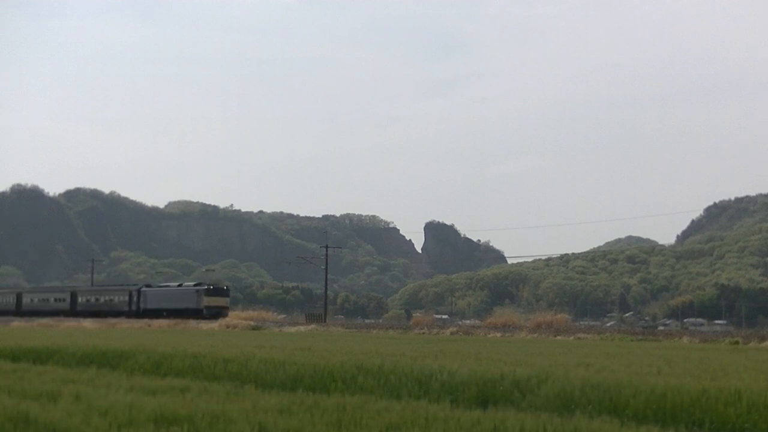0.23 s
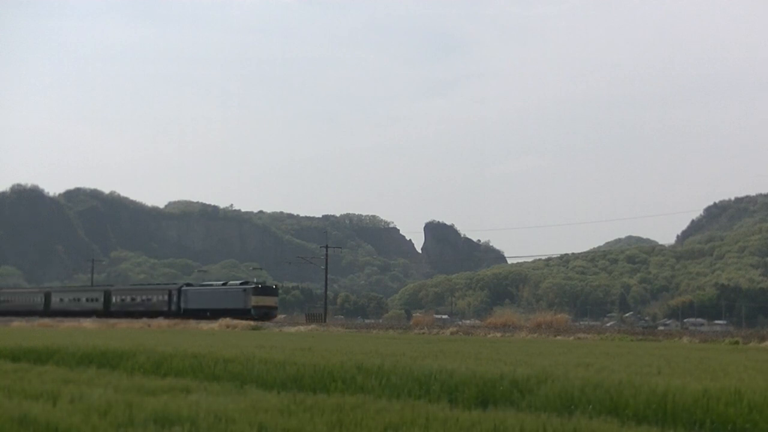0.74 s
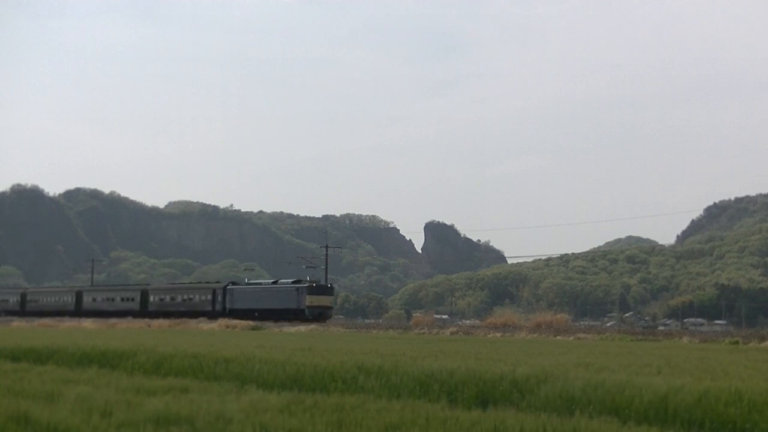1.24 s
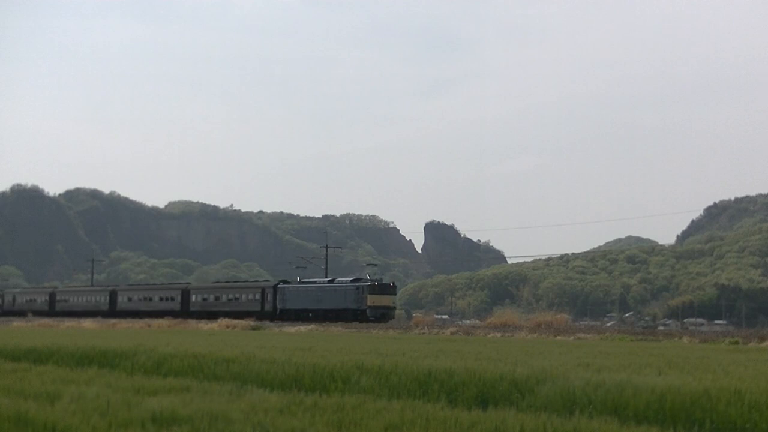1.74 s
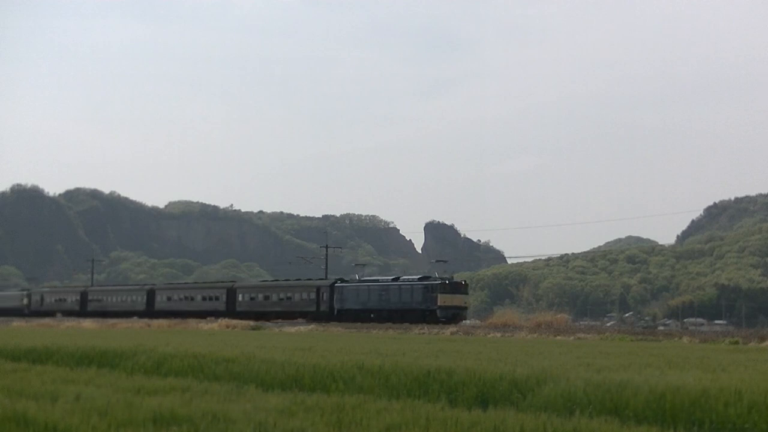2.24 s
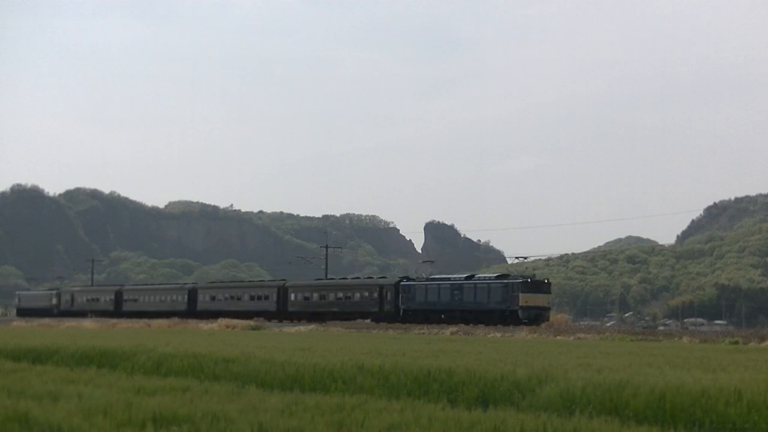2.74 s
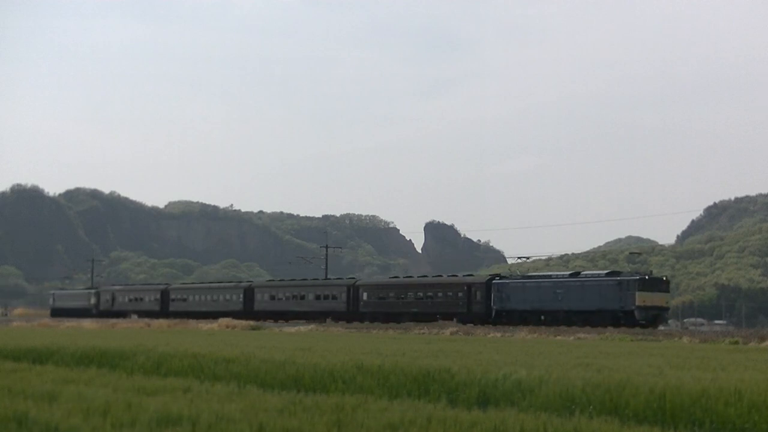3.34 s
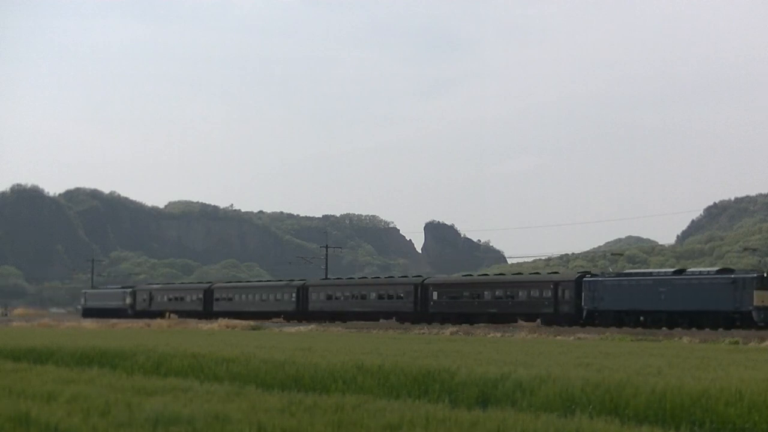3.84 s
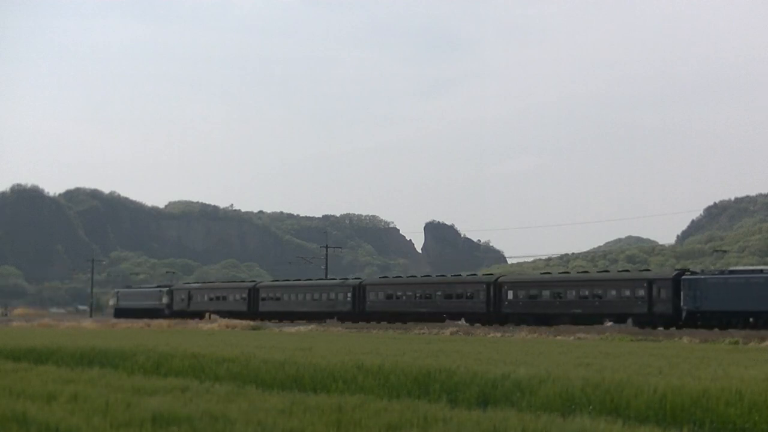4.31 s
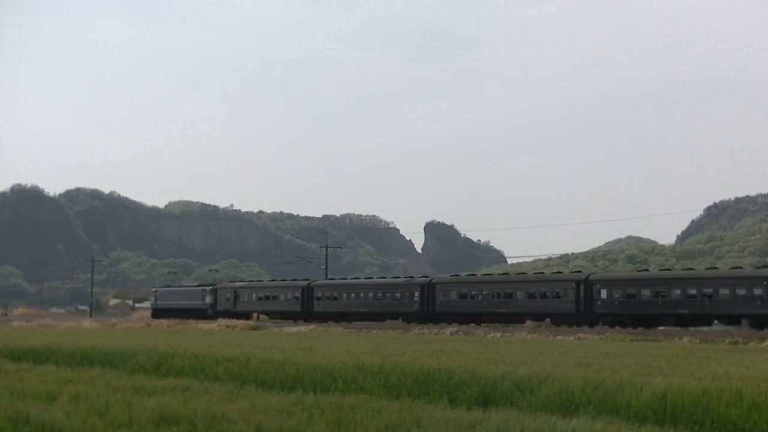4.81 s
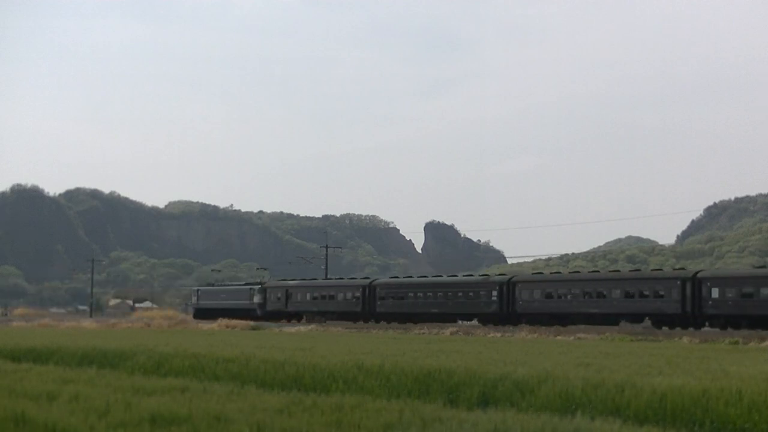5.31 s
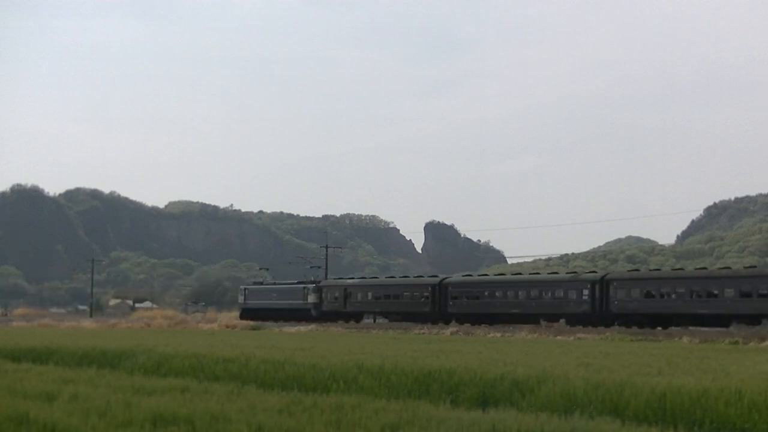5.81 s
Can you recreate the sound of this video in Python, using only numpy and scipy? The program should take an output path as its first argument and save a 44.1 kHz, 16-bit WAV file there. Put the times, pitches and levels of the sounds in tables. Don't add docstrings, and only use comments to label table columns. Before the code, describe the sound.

Outdoors beside fields, reflex cameras rattle away while a train whistles once, approaches with a growing roar, and its coaches clatter closely by.

```python
import sys
import numpy as np
from scipy import signal
from scipy.fft import rfft, irfft, next_fast_len
from scipy.io import wavfile
from scipy.ndimage import uniform_filter1d, map_coordinates

SR = 44100
rng = np.random.default_rng(int(sys.argv[2]) if len(sys.argv) > 2 else 0)


def wav_out(sig):
    wavfile.write(sys.argv[1], SR, np.round(np.clip(np.atleast_2d(sig).T, -1, 1) * 32767).astype(np.int16))


def boost(x):
    u = np.asarray(x, float) / 20
    return 10 ** u


N = 267246


def unit(x):
    return x / np.sqrt(np.mean(x ** 2) + 1e-20)


def seconds(count=N):
    return np.arange(count) / SR


def along(points, hz):
    f, v = np.transpose(points)
    return np.interp(np.log(hz + 1), np.log(f + 1), v)


def curves(rows):
    s, *cols = np.transpose(rows)
    return [np.interp(seconds(), s, c) for c in cols]


def wobble(rate):
    return map_coordinates(rng.standard_normal(int(N * rate / SR) + 4), [np.arange(N) * rate / SR])


def filtered(x, response):
    m = next_fast_len(N + SR // 2)
    return irfft(rfft(x, m) * response(np.fft.rfftfreq(m, 1 / SR)), m)[..., :N]


def coloured(x, spectrum):
    power = boost(2 * along(spectrum, np.linspace(0, SR / 2, num=4000)))
    scale = np.sqrt(np.mean(power))
    return filtered(x, lambda hz: boost(along(spectrum, hz)) / scale)


def rush(spectrum, alike, patchy_db):
    z = signal.stft(rng.standard_normal((2, N)), nperseg=512)[2]
    field = uniform_filter1d(rng.standard_normal(z.shape[1:]), size=5, axis=0)
    field = uniform_filter1d(field, size=10, axis=1)
    pair = signal.istft(z * boost(patchy_db * unit(field)), nperseg=512)[1][:, :N]

    def mid_side(hz):
        turn = np.arccos(np.clip(along(alike, hz), -1, 1)) / 2
        return boost(along(spectrum, hz)) * [np.cos(turn), np.sin(turn)]

    mid, side = filtered(pair, mid_side)
    return unit(np.array([mid + side, mid - side]))


def placed(times, shapes):
    at = np.round(np.asarray(times) * SR).astype(int)[:, None] + np.arange(shapes.shape[1])
    return np.bincount(at.ravel(), shapes.ravel(), N + SR)[:N]


# time_s, level_db
WIND_STRENGTH = [(0, -52), (.33, -44.5), (.55, -37), (.7, -42), (.9, -49), (1.2, -50), (1.5, -53),
                 (1.8, -74.5), (2.3, -65), (2.5, -71), (2.75, -68), (3.1, -58), (4, -75), (6.06, -75.5)]
# pitch_hz, level_db (per Hz)
BUFFET_COLOUR = [(12, -51.5), (20, -19.5), (59, -2.5), (114, 3.5), (200, -6.5), (321, -19), (357, -23),
                 (500, -24.5), (650, -61.5), (1100, -120)]
# pitch_hz, level_db (per Hz)
HUSH_COLOUR = [(180, -22), (300, -3), (3490, -5), (3860, -11), (4950, -20), (5470, -18.5), (14100, -26),
               (15800, -41)]


def wind():
    level_db, = curves(WIND_STRENGTH)
    push = rush(BUFFET_COLOUR, [(100, 0.92)], patchy_db=5.0) * boost(level_db + 1.7 * wobble(30))
    fields = boost(-54) * rush(HUSH_COLOUR, [(1000, 0.092)], patchy_db=1.0)
    return push * [[1.35], [-.68]] + fields


# start_s, stop_s, level_db
MOTOR_RUNS = [
    (0.203, 1.3, -62.5),
    (1.304, 2.437, -64.5),
    (2.475, 2.722, -50),
    (2.752, 2.996, -42.5),
    (3.069, 3.888, -50.5),
    (3.88, 4.3, -62),
]
# pitch_hz, level_db (per Hz)
CLACK_COLOUR = [(290, -55), (500, -9.5), (1520, -3.5), (1940, -3), (2210, -2), (2410, -1.5), (3140, -2),
                (6410, -5), (7780, -14.5), (9000, -37.5), (11700, -54), (19800, -120)]
# pitch_hz, level_db (per Hz)
SNAP_COLOUR = [(5000, -35), (7600, -3.5), (8400, -0.5), (9300, 1.5), (10200, -4.5), (12000, -6.5),
               (14000, -12.5), (15900, -19.5)]


def gears():
    t = seconds()
    running = sum(boost(db) * ((t > start) & (t < stop)) for start, stop, db in MOTOR_RUNS)
    running = uniform_filter1d(running, size=1800)
    teeth = running * boost(4.2 * wobble(350) + 2.96 * wobble(40.01))
    dull = boost(6.0) * rush(CLACK_COLOUR, [(3000, 0.5)], patchy_db=2.0)
    bright = boost(-7) * rush(SNAP_COLOUR, [(9000, 1.0)], patchy_db=-3.5)
    return teeth * (dull + bright)


def burst(cycle, frames, pan_db):
    rows = np.tile(np.c_[cycle, np.full(len(cycle), pan_db)], (len(frames), 1, 1))
    rows[..., 0] += np.array(frames)[:, None]
    rows[..., 1] += rng.normal(0, 0.57, rows.shape[:2])
    rows[..., 2] *= 1 + rng.normal(0, 0.033, rows.shape[:2])
    return rows.reshape(-1, rows.shape[2])


def single(rows, pan_db):
    return np.c_[rows - np.array([0, 3, 0, -2]), np.full((len(rows), 2), [1.8, pan_db])]


# start_s, peak_db, ring_hz, brightness_db
DISTANT_CONTACTS = [(0.0598, -40, 5500, -21), (0.1376, -47, 4580, -17), (0.158, -39, 5430, -29),
                    (0.3586, -45, 3920, -28), (0.8003, -36.5, 4770, -29), (0.8472, -32, 4910, -18.5),
                    (0.9323, -33, 4350, -33), (0.988, -34.5, 5090, -29), (1.0026, -34, 3520, -32),
                    (1.0456, -30.5, 5070, -20.5), (1.2077, -39, 4500, -23)]
CROWD_CONTACTS = [(1.2415, -25, 5560, -27.5), (1.2618, -24, 5880, -20.5), (2.5574, -24.5, 3480, -24),
                  (2.5945, -28, 3700, -29.5), (2.6266, -27, 1290, -23), (2.7023, -21, 2700, -26),
                  (2.7095, -17, 2400, -19.5), (2.7478, -12.5, 2580, -17.5), (2.7601, -13.5, 5240, -20),
                  (2.8014, -14, 2830, -28), (2.8164, -25, 2400, -23.5), (2.838, -14.5, 2420, -20),
                  (2.8588, -13.5, 5500, -17), (2.8776, -16, 2880, -18), (2.916, -22, 1500, -14.5),
                  (2.943, -17.5, 6640, -20), (2.959, -20.5, 2400, -14), (2.9816, -27.5, 2900, -21.5),
                  (4.3066, -28.5, 2200, -19), (4.4895, -45, 5200, -18), (4.5269, -40.5, 5200, -20.5),
                  (4.8248, -37.5, 5170, -17), (4.6203, -26.5, 5430, -37), (4.9924, -31, 3400, -16.5),
                  (5.024, -28.5, 3980, -16)]
# after_clack_s, peak_db, ring_hz, brightness_db, rise_ms
DISTANT_CYCLE = [
    (-.052, -39, 4200, -28.5, 1.8),
    (-.022, -37, 4530, -25.5, 1.8),
    (0, -31.5, 4600, -25.5, 1.8),
    (.036, -31, 4840, -28.5, 1.8),
]
DISTANT_FRAMES = [.275, .4412, .605]
SLOW_CONTACTS = [
    (-.036, -32, 2470, -23.5, 4.03),
    (-.0185, -28, 5870, -20.5, 3.5),
    (.0012, -22.5, 3000, -25.5, 1.3),
    (.018, -33.5, 2500, -24.5, 1.2),
    (.031, -35, 5220, -22, 5),
    (.0435, -29, 6666, -25.5, 1.2),
    (.0555, -30, 5140, -19, 1),
]
SLOW_CLACKS = [1.314, 1.431, 1.551, 1.672, 1.793, 1.914, 2.042, 2.164, 2.284, 2.404, 2.525, 2.645]
SIDE_CYCLE = [
    (-.0145, -27, 4700, -19.5, 2.59),
    (0, -27, 5180, -26.5, 1.5),
    (.0625, -33.5, 3090, -15, 4.5),
    (.08, -32, 3400, -15.5, 2.5),
    (.108, -30.5, 2840, -24, 1.8),
]
SIDE_FRAMES = [2.574, 2.717, 3.0038, 3.145, 3.287, 3.429, 3.5741, 3.716, 3.8507]
FAST_CONTACTS = [
    (-.0185, -33.5, 3850, -28, 1.5),
    (-.0115, -32.5, 2790, -14, 1.8),
    (0.001, -22.5, 3770, -27.5, 1),
    (.004, -32.5, 1404, -31.5, 2.5),
    (.030, -25.5, 1414, -23.5, 3.5),
    (.0545, -35, 6400, -19, 4),
    (.0625, -24.5, 3575, -22.5, 2),
]
FAST_CLACKS = 3.0251 + .1069 * np.arange(12)


def contacts():
    return np.vstack([
        single(DISTANT_CONTACTS, pan_db=8),
        single(CROWD_CONTACTS, pan_db=-2.0),
        burst(DISTANT_CYCLE, DISTANT_FRAMES, pan_db=-2.7),
        burst(SLOW_CONTACTS, SLOW_CLACKS, pan_db=0.8)[2:],
        burst(SIDE_CYCLE, SIDE_FRAMES, pan_db=7.0)[:-2],
        burst(FAST_CONTACTS, FAST_CLACKS, pan_db=-2.2)])


def cameras():
    s, db, ring_hz, bright_db, rise_ms, pan_db = contacts().T[:, :, None]
    rise = rise_ms / 1000
    t = seconds(SR // 12)
    u = t / np.clip(rise, .0004, .008)
    fall = boost(db - 4.0) * (u * np.exp(1 - u)) ** 1.47
    trail = boost(db - 11.0 - 60 * t / 0.099) * (1 - np.exp(-t / 0.0079))
    ring = 0.5 * (3500 / ring_hz) ** 0.31 * fall * np.sin(2 * np.pi * ring_hz * t)
    noise = rng.standard_normal((len(s), 2, len(t)))
    clack = 0.53 * (fall + trail) * noise[:, 0]
    snap = 0.58 * boost(bright_db + 8.0) * (fall + trail) * noise[:, 1]
    start = s[:, 0] - .45 * rise[:, 0]

    def heard(part):
        return np.array([placed(start, boost(side * pan_db / 2) * part) for side in (1, -1)])

    direct = heard(ring) + coloured(heard(clack), CLACK_COLOUR) + coloured(heard(snap), SNAP_COLOUR)
    scatter = rng.standard_normal((2, SR // 20)) * boost(-60 * seconds(SR // 20) / 0.25)
    scatter = scatter / np.linalg.norm(scatter[0])
    return direct + boost(-11.0) * signal.fftconvolve(direct, scatter, axes=1)[:, :N]


# time_s, pitch_hz, level_db
WHISTLE_NOTE = [
    (1.86, 2505, -34),
    (1.884, 2680, -25.5),
    (1.907, 2737, -17),
    (2.045, 2749, -16.5),
    (2.19, 2747, -21.5),
    (2.268, 2748, -13),
    (2.315, 2729, -19),
    (2.355, 2666, -33),
    (2.392, 2554, -34),
]
# level_db at full pressure, loss_db per root Hz of pitch sag
LOW_OVERTONES = [(-31.5, 2), (-52, 1)]
# partial_number, level_db under the 1st
HIGH_OVERTONES = [(4, -49.5), (5, -54.5)]
# time_s, half_width_s, first_db, second_db, third_db
EDDIES = [(1.873, 0.0041, -16, -2, -4), (1.923, 0.012, -3.5, -7, -6), (1.952, 0.0055, -5, 3, 0),
          (1.98, 0.019, 0, -15.5, -7), (2.003, 0.0078, -3, 4, -9), (2.064, 0.006, -5.5, -4.5, -4),
          (2.105, 0.0051, -3.5, -3, -3.5), (2.16, 0.015, -6.5, -15, -0.5), (2.175, 0.0052, 2.5, -26, -1),
          (2.3, 0.0051, 3, -11, 2), (2.328, 0.0022, -10, -13, -10)]
# delay_s, level_db
WHISTLE_ECHOES = [(0.011, -35), (.045, -28), (.09, -26), (0.16, -33)]


def whistle():
    pitch, level_db = curves(WHISTLE_NOTE)
    t = seconds()
    sag = np.sqrt(np.clip(2745 - pitch, 0, None))
    levels = np.array([level_db] + [db - loss * sag for db, loss in LOW_OVERTONES])
    fades = sum(np.outer(db, np.exp(-((t - s) / half) ** 2)) for s, half, *db in EDDIES)
    first_db, second_db, third_db = levels + fades
    phase = 2 * np.pi * np.cumsum(pitch + 4 * wobble(60)) / SR
    tone = boost(first_db + 0.34 * wobble(90)) * np.sin(phase)
    tone += boost(second_db + 4.2 * wobble(90)) * np.sin(2 * phase)
    tone += boost(third_db + 3.2 * wobble(110)) * np.sin(3 * phase)
    for k, db in HIGH_OVERTONES:
        tone += boost(level_db + db - 1.3 * sag + 3.5 * wobble(60)) * np.sin(k * phase)
    blowing = (t > WHISTLE_NOTE[0][0]) & (t < WHISTLE_NOTE[-1][0])
    direct = np.sqrt(2) * tone * uniform_filter1d(blowing * 1., size=250)

    def echoes():
        return sum(boost(db + 2.1 * wobble(30)) * np.roll(direct, round(s * SR)) for s, db in WHISTLE_ECHOES)

    return direct * boost([[.4], [-.4]]) + [echoes(), echoes()]


# pitch_hz, width_hz, level_db
WHEEL_RESONANCES = [(304.5, 42, -6.5), (582, 30, -18), (882, 133, -5), (1750, 25, -14), (2163, 61, -1),
                    (2833, 94, 0), (3265, 234, -0.5), (3940, 280, -6)]


def wheel_ring(f):
    return 1 + sum(1.42 * boost(db) * 1j * f * w / (c * c - f * f + 1j * f * w) for c, w, db in WHEEL_RESONANCES)


# time_s, hiss_db (from the locomotive), roll_db (from the coaches)
NEARNESS = [
    (0.0, -57.5, -52),
    (0.52, -55.5, -51.5),
    (0.88, -57.5, -52),
    (2.92, -46.5, -45.5),
    (4.85, -45, -43.5),
    (6.06, -43, -39),
]
# pitch_hz, level_db (per Hz)
RUMBLE_COLOUR = [(15, -47), (25, -44), (48, -4), (75, 1), (123, 2), (204, -28.5), (300, -2.5), (390, -64.5),
                 (660, -120)]
# pitch_hz, level_db (per Hz)
ROLL_COLOUR = [(88, -29), (150, -6), (205, -5), (381, -4), (507, -4.5), (578, -1.5), (734, -1), (910, -2.5),
               (1210, 1), (1380, -2), (2000, -8.5), (2150, -9), (2600, -4), (3380, -43), (5720, -120)]
# pitch_hz, level_db (per Hz)
HISS_COLOUR = [(880, -5), (1500, -5.5), (2000, 0), (2160, -2), (3020, -5), (3230, -5), (5140, -3),
               (6080, -12.5), (6910, -12.5), (8250, -22), (9750, -20), (10800, -25), (15800, -33)]
# time_s, pitch_hz, level_db
WHEEL_SONG = [
    (5.45, 1296, -54),
    (5.658, 1285, -45),
    (5.8, 1294, -54),
]
# pitch_hz, likeness (1 = same)
TRAIN_ALIKE = [(60, 0.92), (180, 0.75), (550, 0.98), (1650, 0.95), (4970, 0.96), (15000, 1)]


def rolling():
    hiss_db, roll_db = curves(NEARNESS)
    rumble_db = -57 + 0.42 * (roll_db - roll_db[0])
    shake = wobble(7.2)
    roll = boost(roll_db + 1 + 0.52 * shake + 0.64 * wobble(25)) * rush(ROLL_COLOUR, TRAIN_ALIKE, patchy_db=0.73)
    hiss = boost(hiss_db + 3 + 0.16 * shake) * rush(HISS_COLOUR, TRAIN_ALIKE, patchy_db=1.04)
    rumble = boost(rumble_db + 1.8 * shake + 0.53 * wobble(26))
    rumble = rumble * rush(RUMBLE_COLOUR, [(100, 0.99)], patchy_db=2.0)
    (first_s, first_hz, _), (last_s, last_hz, _) = WHEEL_SONG[0], WHEEL_SONG[-1]
    fade_in, fade_out = (first_s - .03, first_hz, -90), (last_s + .03, last_hz, -90)
    pitch, song_db = curves([fade_in, *WHEEL_SONG, fade_out])
    song = np.sqrt(2) * boost(song_db) * np.sin(2 * np.pi * np.cumsum(pitch) / SR)
    return rumble + boost(-2.5) * filtered(roll + hiss, wheel_ring) + song


# pitch_hz, half_width_hz
RAIL_BANDS = [(597, 48), (918, 43), (6850, 280)]
# loudest_s, level_db, rise_db_per_s, fall_db_per_s
RAIL_SWELLS = [(6.16, -41.5, 8.5, 0), (4.8, -54, 3, 16), (5.05, -53, 34, 15)]


def rail_hum():
    t = seconds()
    hum = 0
    for (hz, width), (s, db, rise, fall) in zip(RAIL_BANDS, RAIL_SWELLS):
        level_db = db - rise * np.maximum(s - t, 0) - fall * np.maximum(t - s, 0)
        band = [(0.82 * hz, -120), (hz - width, -9), (hz, 0), (hz + width, -9), (1.1 * hz, -120)]
        hum = hum + boost(level_db) * rush(band, TRAIN_ALIKE, patchy_db=1.0)
    return hum


# pitch_hz, level_db (per Hz)
SCRUB_COLOUR = [(3000, -44), (4200, 2.5), (5600, 3), (6900, -3), (7500, -2), (8200, -37), (9500, -120)]


def flanges():
    t = seconds()
    full_s, full_db, rise_db_per_s, past_joint_db = 4.8, -53.5, 54, 8.5
    past_joint = np.clip((t - NEAR_AXLES[0][0]) / 0.035 + 1, 0, 1)
    level_db = full_db + rise_db_per_s * np.minimum(t - full_s, 0) + past_joint_db * past_joint
    return boost(level_db + 0.61 * wobble(8)) * rush(SCRUB_COLOUR, TRAIN_ALIKE, patchy_db=3.0)


# first_axle_s, boom_db, loudest_s after the first axle
FAR_JOINTS = [
    (1.041, -45, 0.21),
    (2.125, -44, 0.32),
    (3.096, -41.5, 0.55),
    (4.056, -36, 0.51),
    (4.991, -39.5, .1),
]
AXLE_TIMES = [0, .128, .247, .375, .497, .616, .744]


def far_axles():
    first, db, loudest = np.transpose(FAR_JOINTS)[:, :, None]
    after = np.array(AXLE_TIMES)
    when = first + after
    screen_db = 61.5 * (after - loudest) ** 2
    size = db - screen_db + 1.0 * rng.standard_normal(when.shape)
    return when.ravel(), size.ravel()


# start_s, peak_db, boom_db
NEAR_AXLES = [
    (5.268, -17.5, -50),
    (5.4, -18, -41.5),
    (5.518, -20, -51),
    (5.574, -25, -46),
    (5.644, -17.5, -47),
    (5.757, -17.5, -44),
    (5.798, -30, -46),
    (5.886, -20.5, -43.5),
    (5.917, -26, -64),
    (6.019, -31, -41),
]
# pitch_hz, level_db (per Hz)
BLOW_COLOUR = [(88, -30), (150, 1.5), (871, 1), (1410, -7.5), (1850, -0.5), (2440, -15.5), (2720, -9),
               (3040, -13.5), (4000, -9.5), (5200, -25), (8800, -120)]


def joints():
    t = seconds(SR // 4)
    s, db, boom_db = np.transpose(NEAR_AXLES)
    far_s, far_db = far_axles()
    onset = 1 - np.exp(-t / 0.0054)
    swell = placed(s, boost(db[:, None] - 5 - 60 * t / 0.12) * onset)
    blows = swell * boost(1.3 * wobble(150)) * rush(BLOW_COLOUR, [(500, 0.99)], patchy_db=1.4)
    when, size = np.r_[s, far_s], np.r_[boom_db + 3, far_db]
    pitch = (98 + 6 * when[:, None]) * np.exp(.05 * rng.standard_normal((len(when), 1)))
    notes = np.sin(2 * np.pi * pitch * t) + 0.47 * np.sin(2 * np.pi * 2.91 * pitch * t)
    boom = boost(size[:, None] - 60 * t / 0.085) * onset * notes
    return boost(-3.0) * filtered(blows, wheel_ring) + 2.36 * placed(when, boom)


def scene():
    train = whistle() + rolling() + rail_hum() + flanges() + joints()
    return wind() + gears() + cameras() + train


def band_limit(x):
    return signal.sosfilt(signal.butter(12, 16010, fs=SR, output="sos"), x)


def record(dry):
    top_hz = 15850
    mix = filtered(dry, lambda hz: hz < top_hz)
    return band_limit(mix)


dry = scene()
out = record(dry)
wav_out(out)
```